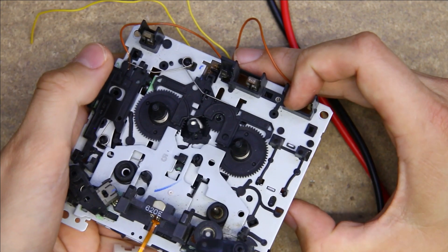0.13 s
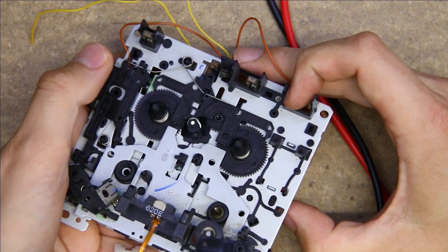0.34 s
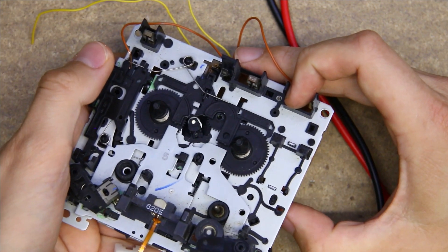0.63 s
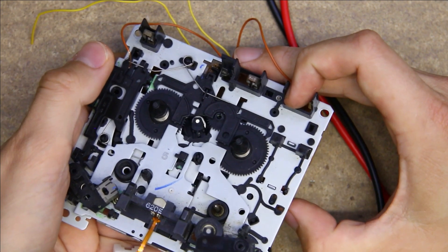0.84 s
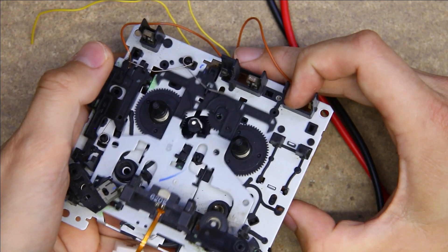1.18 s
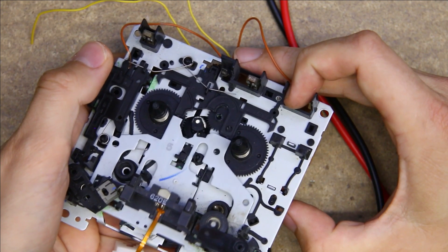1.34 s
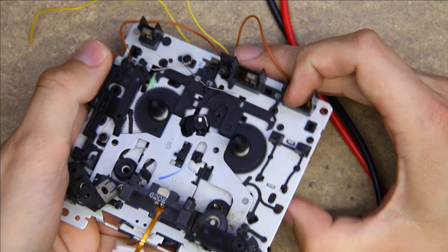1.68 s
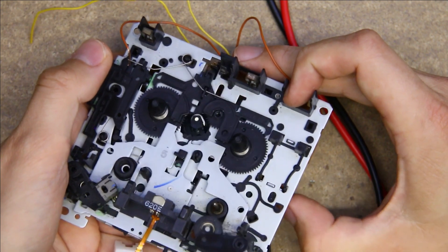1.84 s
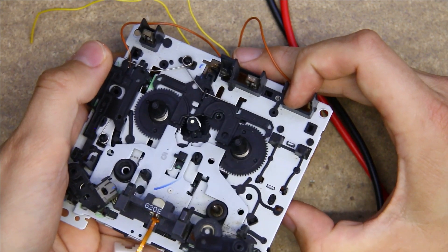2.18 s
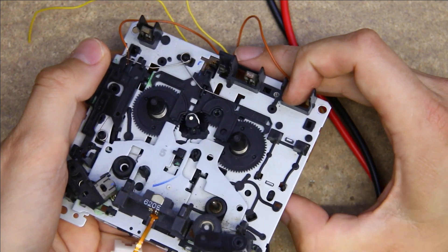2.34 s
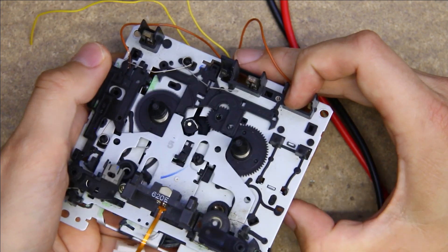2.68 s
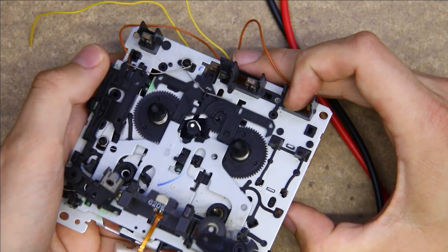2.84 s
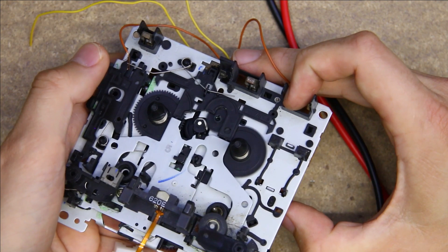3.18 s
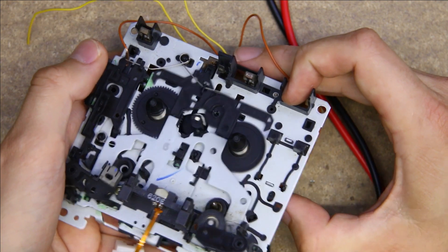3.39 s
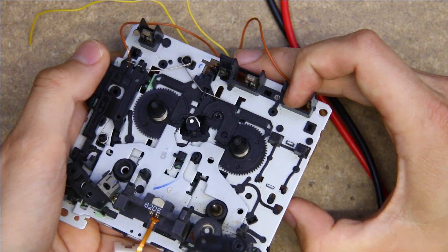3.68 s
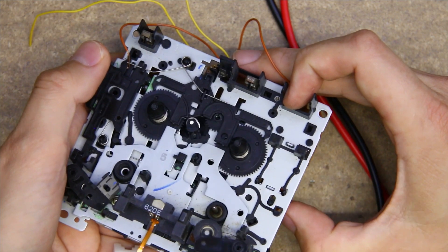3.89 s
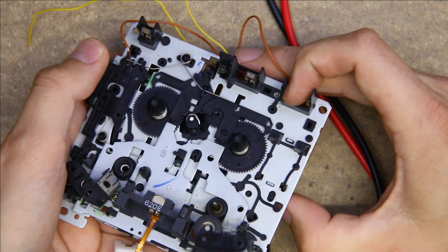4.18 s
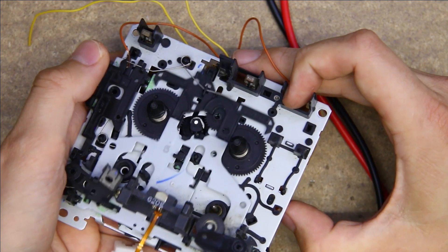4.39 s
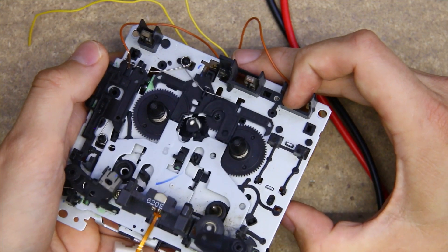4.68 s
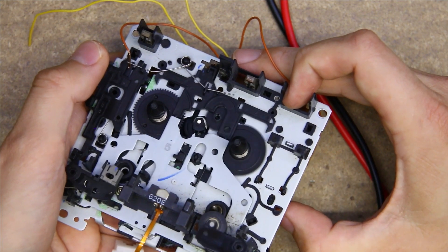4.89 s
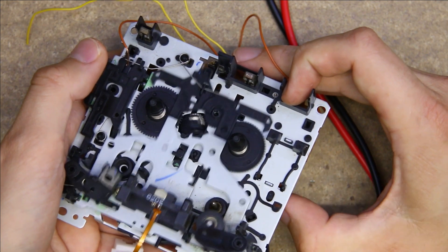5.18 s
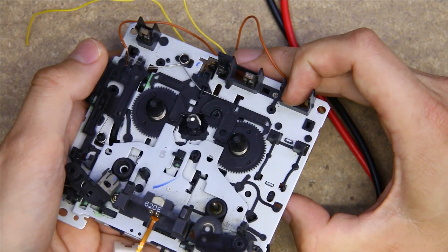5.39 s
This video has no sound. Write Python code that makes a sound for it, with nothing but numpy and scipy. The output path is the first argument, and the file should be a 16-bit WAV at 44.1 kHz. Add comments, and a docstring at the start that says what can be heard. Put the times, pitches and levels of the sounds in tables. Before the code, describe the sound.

Close stereo pickup of an open cassette mechanism held in the hands in a quiet, moderately live room. Soft hiss, faint hum and wavering low rumble run throughout. Faint ticks and a loose plastic scrape open it, then a bright lever snap at 0.2 s and a plunger clack at 0.8 s with small rebounds. Snaps come at 1.1, with a slide landing, and 1.4 s; a strong cam knock at 1.8, a snap at 2.0, a plunger blow at 2.4. After little ticks, a heavier snap and landing at 2.8, another snap at 3.1. Two loud knocks at 3.5 and 3.6 run into a snap at 3.7. A weightier plunger clunk at 4.2, tiny latch clicks, a loud snap at 4.6 and a weaker one at 4.9 follow. Rapid knocks around 5.25 s and a final knock-and-plunger clack near 5.5 s end it abruptly. Every hit is short, hard and metallic-plastic, with a brief ring and room tail.

```python
"""A tape transport works in a quiet room: hiss, hum and rumble throughout, all of it filtered noise.
After faint ticks, a loose slide and a cam knock, a lever snaps (0.2 s) and the plunger hits its stop (0.8 s).
Snaps, slide landings, cam knocks and latch clicks follow, with plunger blows at 2.4 and 4.2 s; a run of
cam knocks and a last plunger blow end it (5.2-5.5 s). Each blow is a noise burst of tiny contacts that
rings the parts and frame modes, then a reverberant tail; loose parts slide as clumped friction noise."""
import sys
import numpy as np
from scipy import signal
from scipy.fft import rfft, irfft, next_fast_len
from scipy.io import wavfile
from scipy.ndimage import uniform_filter1d

SR = 44100
rng = np.random.default_rng(int(sys.argv[2]) if len(sys.argv) > 2 else 0)


def pcm_store(signal):
    """Save signal as 16-bit PCM."""
    levels = np.round(np.clip(np.atleast_2d(signal), -1, 1) * 32767)
    wavfile.write(sys.argv[1], SR, levels.astype(np.int16).T)


N = 243695

HISS_TOP_HZ = 15900
# Groups of parts, jolt to springs: (centre [Hz], width [Hz])
PARTS = [(215, 140), (580, 474), (1100, 790), (1950, 670), (3050, 1480), (4900, 2710), (7200, 4570),
         (9500, 3160), (12800, 7800)]
# Left-right likeness of blows and slides: (frequency [Hz], likeness [-1..1])
BLOW_ALIKE = [(600, 1), (1400, 0.94), (3100, 0.85), (6000, 0.66), (15000, 0.92)]

# Hard contacts: (time [s], level [dB], extra weight [dB], extra brightness [dB],
#                 most rung plate [Hz], most rung small part [Hz])
# Plunger hits its stop, columns as above
PLUNGER = [(0.768, -13, -2, -5, 1120, 7000), (2.358, -12.5, 0.5, -5.5, 1050, 7010),
           (4.155, -17.5, 6.5, -1.5, 930, 6800), (5.49, -8, -4.5, -0.5, 1200, 7140)]
# Sprung lever snaps over, columns as above
SNAPS = [(0.227, -8, -3.5, 1.5, 1220, 13000), (1.135, -10.5, 3, 2.5, 562, 12100),
         (1.433, -15, 1, 1, 474, 12700), (2.02, -8, -6, 2, 980, 12600), (2.763, -8, 4, 2, 1320, 5000),
         (3.072, -12, -3, -2, 1250, 12200), (3.697, -10, -6.5, 0.5, 972, 12700),
         (4.566, -6, -1.5, -0.5, 610, 12900), (4.876, -15, 2, 2, 1490, 4870)]
# Head slide lands on the plate, columns as above
LANDINGS = [(1.147, -12.5, -2.8, -1, 970, 6840), (2.77, -14.5, 2.7, -2, 1220, 12400),
            (4.572, -15.5, 0.54, 8.5, 1220, 4880)]
# Cam wheel knocks into its next position, columns as above
CAM = [(0.063, -29.5, 18, 3, 1170, 9180), (1.79, -6, 0.5, -3.5, 1290, 4660),
       (1.846, -21.5, 10.5, 3.5, 716, 4740), (3.518, -5, 4, 1.5, 1170, 8600),
       (3.614, -3.5, -5, -3, 1180, 4960), (5.249, -5.5, -5.5, -2, 895, 4900),
       (5.258, -17.5, 0, -4, 1180, 7520), (5.296, -4.5, 2, 1.5, 1130, 7030),
       (5.473, -6, -0.5, -2, 700, 7000)]
# Lever rides up the cam, columns as above
LEVERS = [(1.756, -18.5, 0, -3.5, 910, 4070), (3.432, -35, 12, 4, 1040, 7000),
          (3.677, -15.5, -11, -0.5, 1160, 5030)]
# Small latch clicks, columns as above
LATCH = [(2.635, -22.5, 0, 0.092, 3430, 8100), (4.311, -23, 3.5, -0.39, 1010, 5340),
         (4.32, -26, -3, -1.2, 930, 4700), (4.439, -21, -12, 0.36, 3420, 8060)]
# Loose plastic parts tick: (time [s], level [dB], extra weight [dB], extra brightness [dB])
TICKS = [(0.022, -37, 4, 4), (0.056, -33.5, 1, 5), (0.746, -40, -5, 0), (0.828, -28, -4, 2),
         (0.916, -31.5, 5, 4), (1.065, -43, 0, 3), (1.108, -35, 5, -6), (1.16, -24, -9, -8),
         (1.315, -33, 2, -7), (2.448, -32, -8, 0), (2.605, -33.5, -3, -3), (2.623, -31, -14, 2),
         (2.631, -27, -3, -1), (2.792, -31, -7, -5), (2.87, -36, 4, 6), (2.955, -30, 1.5, -4),
         (3.406, -39, 0, -1), (3.502, -34, -5, 11), (4.144, -29.5, -2, 4.5), (4.251, -37, 5, 2),
         (4.396, -31, -7, -2), (4.427, -38, -3, 10), (4.484, -40, 7, 0), (4.532, -33.5, 6, 2),
         (4.757, -28, -4, -8), (5.486, -19, -1, 9)]
# Parts rebound dully on the plate: (time [s], level [dB], extra weight [dB], extra brightness [dB])
REBOUNDS = [(0.793, -32, -12, 3), (0.84, -24.5, -7, 8), (0.91, -39, -2, 15), (0.935, -27, -7, 8),
            (1.086, -42, -4, 1), (1.337, -31.5, 2, 2), (2.38, -26, -8, -6), (2.456, -36, 2, 5),
            (2.508, -38, 5.5, -3), (2.56, -36.5, -3.5, 5), (2.701, -38, -4, -5), (2.812, -38, 9, -1),
            (2.975, -31, -2.5, -1), (3.428, -43, 0, 3), (3.687, -30, 1.5, -4), (4.505, -38.5, -0.5, 2),
            (4.778, -31.5, -3, -12), (5.219, -39, 7, 0)]


def amp(db):
    """Gain of a level in dB."""
    return 10 ** (np.asarray(db) / 20)


def unit(x):
    """Scaled to rms 1."""
    return x / np.sqrt(np.mean(np.abs(x) ** 2) + 1e-20)


def along(points, hz):
    """(Hz, value) points interpolated on a log frequency axis."""
    f, v = np.transpose(points)
    return np.interp(np.log(hz + 1), np.log(f + 1), v)


def resonance(hz, centre_hz, width_hz):
    """Causal response of one damped mode, 1 at its centre."""
    damping = 1j * hz * width_hz
    return damping / (centre_hz ** 2 - hz ** 2 + damping)


def spread(pair, alike, hz):
    """Left and right spectra from two unrelated ones, as alike as asked."""
    turn = np.arccos(np.clip(along(alike, hz), -1, 1)) / 2
    mid, side = pair[0] * np.cos(turn), pair[1] * np.sin(turn)
    return np.array([mid + side, mid - side])


def causal(db, size):
    """Minimum-phase response with these dB on an even frequency grid: it answers only after the blow."""
    cepstrum = irfft(np.log(amp(db)))
    half = len(cepstrum) // 2
    cepstrum[1:half] *= 2
    cepstrum[half + 1:] = 0
    return rfft(irfft(np.exp(rfft(cepstrum))), size)


def background():
    """Room noise and microphone hiss, two narrow wavering hums and a low rumble that comes and goes."""
    # Spectrum of room and hiss: (frequency [Hz], relative level [dB per Hz])
    quiet = [(25, -20), (53, -26), (76, -3.5), (102, -4), (270, -6.5), (344, -9), (531, -9.5), (695, -12),
             (962, -10), (1100, -12), (2610, -16.5), (2840, -13.5), (3620, -16), (16000, -24.5)]
    # Left-right likeness: (frequency [Hz], likeness [-1..1])
    quiet_alike = [(30, 0.41), (60, 1), (130, 0.48), (290, 0.66), (640, 0.18), (3100, 0.13), (6000, 0.084),
                   (8000, 1), (15000, 1)]
    # Narrow tones of noise: (centre [Hz], width [Hz], rms level [dB])
    hums = [(276.3, 21, -68.5), (2780, 15, -72.5)]
    # Rumble level: (time [s], level [dB])
    rumble = [(0.0, -73), (1.55, -75), (1.77, -67), (2.55, -81), (5.21, -65.5), (5.27, -78), (5.52, -61)]
    quiet_db, low_hz = -57, 22
    size = next_fast_len(N + 8192)
    hz = np.fft.rfftfreq(size, 1 / SR)

    def noise(colour):
        """Stereo noise of rms 1 in this colour."""
        pair = rfft(rng.standard_normal((2, size)))
        return unit(irfft(spread(pair, quiet_alike, hz) * colour, size))[:, :N]

    passband = (hz < HISS_TOP_HZ) * (hz > low_hz)
    out = amp(quiet_db) * noise(amp(along(quiet, hz)) * passband)
    for centre_hz, width_hz, db in hums:
        out = out + amp(db) * noise(resonance(hz, centre_hz, width_hz) ** 2)
    s, db = np.transpose(rumble)
    rumble_gain = amp(np.interp(np.arange(N) / SR, s, db))
    return out + rumble_gain * noise(resonance(hz, 51, 36) ** 2)


def sliding():
    """Loose parts slide and rattle: clumped grains of friction, coloured by the parts that rub."""
    # Slides: (start [s], length [s], level at start [dB], level at end [dB])
    slides = [(0.0, 0.058, -50.5, -47), (0.073, 0.15, -56, -64), (0.884, 0.12, -63, -59.5),
              (1.038, 0.091, -70, -49), (1.286, .12, -51, -65), (2.573, 0.046, -62, -57),
              (2.92, 0.073, -60, -61), (3.455, 0.072, -57, -48), (4.356, .2, -62, -65),
              (4.728, 0.13, -56, -62), (5.182, 0.064, -58, -59)]
    # Colour of the rubbing parts: (frequency [Hz], relative level [dB per Hz])
    slide_colour = [(240, -9), (400, -8), (839, 4), (979, 5.5), (2120, 4), (3210, -3.5), (4730, 0.5),
                    (13500, -14), (16000, -29)]
    size = next_fast_len(N + 8192)
    hz, t = np.fft.rfftfreq(size, 1 / SR), np.arange(N) / SR
    level = np.zeros(N)
    for s, length_s, first_db, last_db in slides:
        fade = np.clip(np.minimum(t - s, s + length_s - t) / 0.0014, 0, 1)
        level += amp(np.interp(t, [s, s + length_s], [first_db, last_db])) * fade
    clumps = amp(2.8 * unit(uniform_filter1d(rng.standard_normal(N), size=90)))
    grains = rfft(rng.standard_normal((2, N)) * clumps, size)
    colour = amp(along(slide_colour, hz)) * (hz < HISS_TOP_HZ)
    return level * unit(irfft(spread(grains, BLOW_ALIKE, hz) * colour, size)[:, :N])


def room_tail():
    """Two unrelated reverberant tails of energy 1; each frequency dies at its own speed."""
    # Decay: (frequency [Hz], T60 [s])
    room_t60 = [(300, 0.56), (1060, 0.62), (2800, 0.47), (7300, 0.48), (15000, 0.3)]
    hz, t, z = signal.stft(rng.standard_normal((2, SR * 3 // 5)), SR, nperseg=256)
    decay = amp(-60 * t / along(room_t60, hz)[:, None])
    tail = signal.istft(z * decay, SR, nperseg=256)[1]
    t = np.arange(tail.shape[1]) / SR
    tail = tail * np.clip((t - .003) / 0.0015, 0, 1)  # the nearest surfaces answer first
    tail = tail * amp(np.clip((t - .018) / 0.0038, 0, 1))  # walls and ceiling add 1 dB
    echoes = unit(uniform_filter1d(rng.standard_normal(len(t)), size=60))
    tail = tail * amp(3 * echoes * np.exp(-t / 0.032))  # single echoes stand out early, then merge
    return tail / np.linalg.norm(tail, axis=1, keepdims=True)


def chatter(rise_s, t60_s, size):
    """Two unrelated bursts of uneven tiny contacts that rise and die away, energy set by their length."""
    t = np.arange(size) / SR
    shape = (1 - np.exp(-t / max(rise_s, .0002))) ** 2 * amp(-60 * t / max(t60_s, .002))
    grains = rng.standard_normal((2, size))
    strength = amp(13.4 * uniform_filter1d(rng.standard_normal(size), 16))
    contacts = shape * grains * strength
    contacts = contacts / np.linalg.norm(contacts, axis=1, keepdims=True)
    return contacts * np.linalg.norm(shape) / shape.max()


def parts_ring(parts_db, plate_hz, struck_hz, hz, size):
    """Response of the groups of parts plus the frame modes, strongest near the struck place and part."""
    # Sharper modes of the frame: (centre [Hz], width [Hz], level [dB])
    frame = [(213, 31, 12), (513, 7.2, 9.5), (615, 88, 2.5), (734, 46, 4), (995, 112, 2.5), (1001, 5.6, 6),
             (1093, 2.8, 0), (1153, 73, -1), (1215, 8.1, 1), (1780, 200, 1.5), (2178, 8.5, 7.5),
             (2620, 17, -13), (2670, 120, -8), (3093, 67, -2.5), (3480, 150, -26.5), (4853, 220, -3),
             (5520, 270, -6.5), (7000, 480, -7), (7580, 320, -6.5), (8000, 680, -5), (9110, 58, -2.5),
             (10100, 170, -6.5), (11600, 92, -11), (12000, 76, -15), (12260, 150, -9)]
    # How the open frame radiates to the microphone: (frequency [Hz], gain [dB])
    mic = [(100, -60), (250, -20.5), (450, -9.5), (820, -3.5), (1100, -2.5), (1500, -2), (1900, 1),
           (14000, 3.5), (15600, -1.5), (16200, -43), (17000, -19)]
    plate_db, struck_db = 11.5, 11  # greatest lift of the favoured modes
    coarse_hz = np.fft.rfftfreq(1024, 1 / SR)
    part_hz, part_width = np.transpose(PARTS)
    # a group's level is spread over its width
    per_hz_db = parts_db - 10 * np.log10(part_width / (SR / 2)) - 4.5
    colour_db = along(np.transpose([part_hz, per_hz_db]), coarse_hz) + along(mic, coarse_hz)
    modes = np.array([amp(db) * resonance(hz, c, w) for c, w, db in frame])
    mode_hz = np.transpose(frame)[0]
    near_db = struck_db * np.exp(-(np.log(mode_hz / struck_hz) / 0.12) ** 2)
    near_db = near_db + plate_db * np.exp(-(np.log(mode_hz / plate_hz) / 0.23) ** 2)
    scatter_db = rng.normal(0, 3.1, len(modes))  # no two blows land alike
    return causal(colour_db, size) * (1 + amp(near_db + scatter_db) @ modes)


def contact_burst(ring, rise_s, t60_s, hz, size):
    """Spectra of the force: slow plate modes feel one shove, quick parts each contact."""
    part_hz = np.transpose(PARTS)[0]
    bands = np.array([np.abs(hz - c) < w / 2 for c, w in PARTS], float)
    heavy = .9 / (1 + (hz / 1600) ** 4)  # share of the single shove
    burst = rfft(chatter(rise_s, t60_s, size=4096), size)
    shove_delay = np.exp(-2j * np.pi * hz * 2 * rise_s)
    shove = np.sqrt(np.mean(np.abs(burst) ** 2)) * shove_delay
    burst = heavy * shove + np.sqrt(1 - heavy ** 2) * burst
    # each group gets its due part of the blow
    due = (bands @ np.abs(ring) ** 2) / (bands @ np.abs(ring * burst[0]) ** 2)
    return burst * np.sqrt(np.interp(hz, part_hz, due / due.mean()))


def blow(parts_db, plate_hz, struck_hz, rise_s, t60_s, pan_db, size):
    """One burst of contacts rings parts and frame; the room answers with a tail of the same colour."""
    # Room level against the blow: (frequency [Hz], level [dB])
    room_db = [(300, 1.5), (1000, -9), (1500, -5.5), (2500, -4.5), (5000, -3.5), (8000, -5), (12000, -4),
               (16000, -9.5)]
    # Left-right likeness of the room: (frequency [Hz], likeness [-1..1])
    room_alike = [(300, 0.99), (1400, 0.84), (3100, 0.28), (6000, 0.022), (8000, 0.98), (15000, 1)]
    hz = np.fft.rfftfreq(size, 1 / SR)
    ring = parts_ring(parts_db, plate_hz, struck_hz, hz, size)
    burst = contact_burst(ring, rise_s, t60_s, hz, size)
    side_sign = rng.choice([-1, 1])
    direct = spread(burst * ring * [[1], [side_sign]], BLOW_ALIKE, hz)
    direct = direct * amp([[pan_db / 2], [-pan_db / 2]])
    burst_size = np.abs(burst[0]) / np.sqrt(np.mean(np.abs(burst[0]) ** 2))
    everywhere = ring * burst[0] / burst_size ** 0.9  # summed over all directions, the colour is smoother
    walls = spread(rfft(room_tail(), size), room_alike, hz) * everywhere * amp(along(room_db, hz))
    return irfft(direct + walls, size)


def mechanism():
    """Plunger, levers, head slide, cam wheel, latch and loose parts strike, each kind in its own balance."""
    # How each kind shakes the groups of PARTS: (contacts, (jolt, thump, plate, brackets, levers, cam,
    # plunger, gears, springs [dB]), rise [s], chatter T60 [s], left over right [dB])
    kinds = [(PLUNGER, (-43, -26.5, -14.5, -18.5, -16, -21.5, -10.5, -23.5, -19.5), 0.00042, 0.021, -0.57),
             (SNAPS, (-38, -28.5, -29, -23.5, -20.5, -15, -19, -19, -12), 0.000725, 0.023, -1.2),
             (LANDINGS, (-32, -27.5, -13, -25.5, -20.5, -16.5, -18.5, -21.5, -39), 0.000875, 0.023, 0.68),
             (CAM, (-29, -34.5, -27, -23.5, -19.5, -17, -16, -20, -17.5), 0.000399, 0.023, -0.71),
             (LEVERS, (-16.5, -20, -19.5, -16.5, -13, -14, -18, -17.5, -19), 0.000953, 0.049, -.6),
             (LATCH, (-38, -35, -34, -27, -16, -16, -17.5, -18, -16.5), .0008, 0.036, -1.9),
             (TICKS, (-26, -25, -30, -18, -17.5, -14, -17.5, -16, -20), 0.00067, 0.018, -1.6),
             (REBOUNDS, (-27, -24.5, -18, -15.5, -20.5, -23, -20.5, -34, -26), 0.000753, 0.032, -.6)]
    # Extra weight felt by each group of PARTS: (share [ratio])
    weight_share = [0.81, 1, 0.8, 0.48, 0.26, 0.24, 0.077, 0, 0.22]
    # Extra brightness felt by each group of PARTS: (share [ratio])
    bright_share = [0, 0, 0.073, 0, 0, 0, 0.4, 1, 0.7]
    # Where faint contacts ring most: (plate [Hz], small part [Hz])
    loose_hz = [1046, 4730]
    size = 1 << 15
    out = np.zeros((2, N + size))
    for contacts, kind_db, rise_s, t60_s, pan_db in kinds:
        for s, db, weight_db, bright_db, *own_hz in contacts:
            plate_hz, struck_hz = own_hz or loose_hz
            parts_db = db + np.array(kind_db) + weight_db * np.array(weight_share)
            parts_db = parts_db + bright_db * np.array(bright_share)
            start = round((s - .0002) * SR)
            out[:, start:start + size] += blow(parts_db, plate_hz, struck_hz, rise_s, t60_s, pan_db, size)
    return out[:, :N]


def scene():
    """The mechanism and its sliding parts over the quiet room."""
    return mechanism() + sliding() + background()


def record(dry):
    """The recorder keeps nothing above its band limit."""
    top_hz = 17000
    size = next_fast_len(N + 8192)
    passband = np.fft.rfftfreq(size, 1 / SR) < top_hz
    return irfft(rfft(dry, size) * passband, size)[:, :N]


dry = scene()
out = record(dry)
pcm_store(out)
```